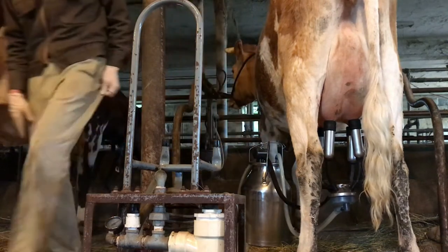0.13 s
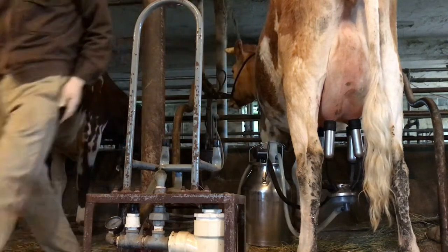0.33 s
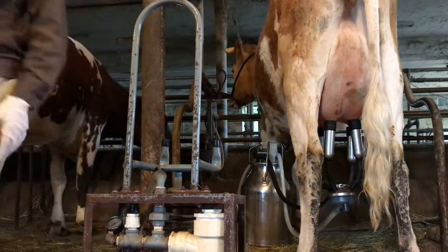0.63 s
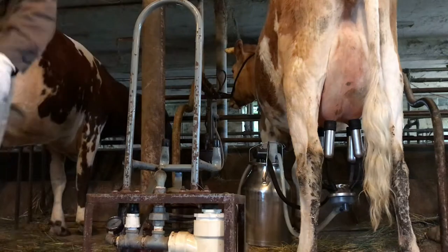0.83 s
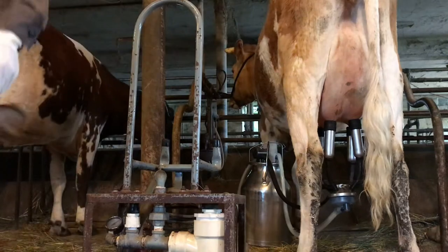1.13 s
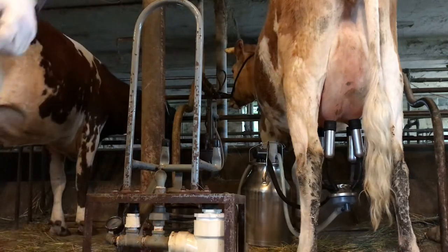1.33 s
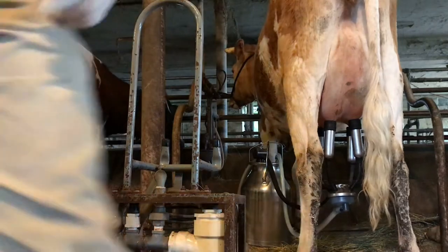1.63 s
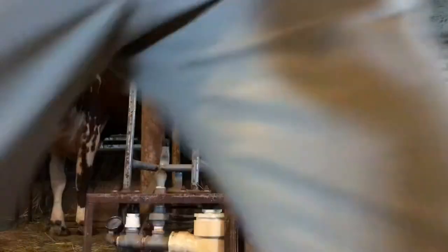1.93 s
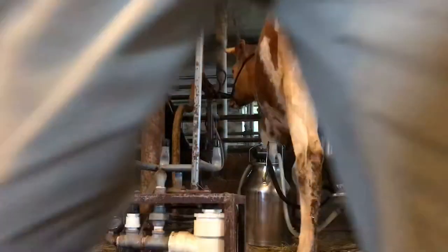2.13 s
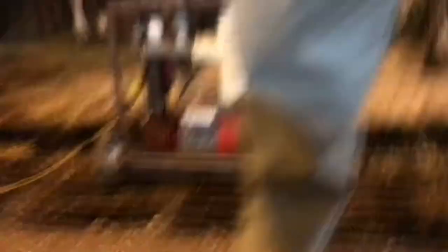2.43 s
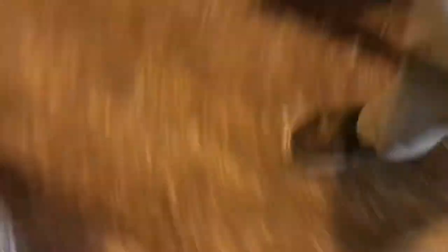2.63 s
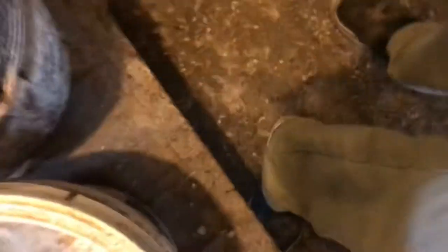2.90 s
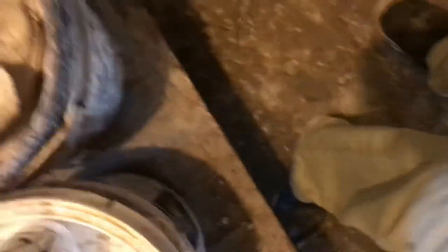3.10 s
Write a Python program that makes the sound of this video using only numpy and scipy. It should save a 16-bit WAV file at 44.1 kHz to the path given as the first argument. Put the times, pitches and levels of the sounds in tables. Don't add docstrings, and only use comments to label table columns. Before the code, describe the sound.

A vacuum pump drones loudly from the start, a fast steady buzz with air hiss, metallic rattle and thin whine in a slightly reverberant barn. Faint plastic ticks come about every half second until 2.7. Treble dips around 1.5 and 2.1; dull microphone knocks cluster at 2.1-2.3, softer ones at 2.55-2.65. The drone turns duller around 2.5, nearly cuts out with tiny clicks at 3.06-3.15, then resumes abruptly, more distant.

```python
import sys
import numpy as np
from scipy import signal
from scipy.fft import rfft, irfft
from scipy.io import wavfile
from scipy.ndimage import uniform_filter1d

SR = 44100
rng = np.random.default_rng(int(sys.argv[2]) if len(sys.argv) > 2 else 0)


def field_ratio(decibels):
    return 10 ** (np.asarray(decibels, dtype=float) / 20)


def dump_mix(stems):
    frames = np.atleast_2d(stems).T
    limited = np.clip(frames, -1, 1)
    pcm = np.round(limited * 32767).astype(np.int16)
    wavfile.write(sys.argv[1], SR, pcm)


N = 143766

BARN_DB, BARN_T60_S, PATCH_DB = -11, 0.2, 0.7

# (time [s], peak level [dB], frequency [Hz])
TICKS = [
    (.084, -29, 4250),
    (.6122, -25.5, 4170),
    (1.1208, -29, 4350),
    (1.6477, -27, 4230),
    (2.156, -34, 4350),
    (2.661, -37, 4100),
]
# (frequency ratio [1], level [dB])
TICK_CLUSTER = [(.95, -6), (.985, -3), (1.02, -3), (1.065, -6)]
# (frequency [Hz], level [dB])
TICK_BODY = [(3440, -5.5), (1130, -3)]
TICK_T60_S = 0.05

# (time [s], level [dB], frequency [Hz], decay time T60 [s])
BUMPS = [(2.108, -28, 170, .04), (2.118, -31, 69.6, .1), (2.142, -24, 65, .1), (2.181, -12, 130.2, 0.075),
         (2.186, -19, 85, .06), (2.197, -22, 292, 0.043), (2.1822, -16, 243, 0.037),
         (2.2143, -15, 344, 0.025), (2.2159, -20, 560, .02), (2.2185, -11.5, 214, 0.037),
         (2.224, -20, 120, .04), (2.249, -24, 254, 0.031), (2.286, -25.5, 340, 0.04),
         (2.29, -29, 540, 0.022), (2.24, -31, 50, .12), (2.536, -26, 76.4, 0.092), (2.556, -23.5, 55, 0.13),
         (2.615, -34, 60, .12), (2.65, -30, 60, .1)]
SCUFF_DB, SCUFF_HZ = -23, 500

VANES_DB = [-2.5, -4.5, -9, -2.5]
# (time [s], peak level [dB])
SLAPS = [(0.179, -13), (0.216, -10), (0.4953, -14), (0.5746, -13.5), (0.6706, -9.5), (0.7014, -9),
         (0.821, -10), (0.842, -9), (0.8821, -11), (0.9129, -9), (1.0174, -11), (1.094, -12.5),
         (1.1312, -11.5), (1.1617, -10), (1.3135, -11), (1.3412, -11), (1.5826, -13), (1.6998, -12),
         (1.7277, -10.5), (1.757, -11), (1.7959, -10), (1.8406, -7.5), (1.9015, -12), (1.9717, -9),
         (1.9899, -8.5), (2.0158, -13.5), (2.072, -12), (2.1211, -11), (2.191, -10), (2.2188, -11.5),
         (2.2518, -10.5), (2.2962, -11.5), (2.3316, -10.5), (2.3594, -11), (2.402, -11), (2.4284, -14),
         (2.4633, -9.5), (2.569, -13), (2.7437, -14), (2.9564, -12)]
SHAFT_HZ = 28.47
KNOCK_DB, KNOCK_SPREAD_DB, KNOCK_JITTER_S, KNOCK_TOP_HZ = -11, 2, 0.00004, 3600
PUFF_DEPTH, PUFF_SHARE = 0.14, 0.49
FLICKER_DB, RATTLE_DB, RATTLE_PER_S = 1.5, -9, 500
SLAP_DB, SLAP_S = 16, 0.0046

# (shaft order [1], rms level [dB])
HUM = [(2.08, -60.5), (4, -37.5), (8, -43.5), (11, -56)]
# (shaft order [1], rms level [dB])
WHINE = [(28, -57.5), (30, -58), (31.4, -45.5), (32, -41.5), (33, -44), (35, -53.5), (37, -53.5), (40, -39),
         (41, -62), (42, -45), (44, -47), (47, -49.5), (48, -62), (49, -47.5), (51, -50.5), (52, -60),
         (55, -54), (57, -50), (61, -47.5), (63, -46), (65, -48), (67, -42), (74, -49), (92, -62.5),
         (96, -53.5), (100, -50), (105, -48), (106, -47.5), (113, -63)]
# (shaft order [1], rms level [dB])
DRONE = [(13, -52.5), (16, -64.5), (20, -51), (24, -60.5), (26, -59.5)]
HUM_WAVER, WHINE_WAVER = 0.05, 0.17
WHINE_TURNED_DB, WHINE_FAR_DB, HUM_FAR_DB = -9.5, -7, -7

# (frequency [Hz], width [Hz], level [dB])
CASING = [(359, 38, -13.5), (565, 87, -15), (905, 70, -3.5), (1150, 110, -4.5), (1380, 130, -10),
          (1793, 190, -3), (1893, 72, -0.5), (2210, 250, -7), (2690, 170, -12), (3018, 125, -1),
          (3210, 140, -6.5), (3527, 170, -6.5), (4500, 200, -14)]
# (frequency [Hz], width [Hz], level [dB])
SILENCER = [(5336, 140, -5), (5913, 125, 3), (6250, 400, 1.5), (6690, 290, -4), (7350, 340, -6),
            (8480, 140, -7), (9325, 155, 0), (9614, 200, 0), (10007, 180, 2), (10900, 190, -5.5),
            (11700, 320, -10), (13140, 250, -10), (14430, 310, -6.5), (15650, 200, -8)]
# (frequency [Hz], width [Hz], level [dB])
TURNED = [(330, 230, -21.5), (880, 47, -9.5), (1300, 120, -8.5), (1890, 540, -5.5), (2990, 200, -3),
          (3460, 410, -9.5), (4480, 440, -14.5), (5350, 150, -5), (6100, 410, -2), (6480, 220, 0.5),
          (7300, 170, -8), (8860, 220, -14), (9680, 870, -3.5), (10800, 480, -5.5), (13900, 700, -18)]
# (frequency [Hz], width [Hz], level [dB])
FAR = [(350, 200, -22), (1230, 130, -5.5), (1880, 730, -6), (3033, 130, 0.5), (3580, 250, -6),
       (4540, 200, -8.5), (5550, 150, -9), (6100, 480, -3.5), (6470, 150, 4.5), (7640, 250, -5.5),
       (8350, 250, -7.5), (9460, 240, -1), (10600, 300, -11.5), (11500, 300, -15), (14100, 300, -17)]
CASING_DB, SILENCER_DB, TURNED_DB, FAR_DB = -17, -14, -15, -12.5
SKIRT = 3.63

# (frequency [Hz], level [dB])
RUSH = [(40, -12), (65, -10.5), (450, -12), (1500, -1.5), (4000, -10.5), (5000, -7.5), (7500, -3.5),
        (15800, -5.5)]
RUSH_DB, RUSH_TURNED_DB, RUSH_FAR_DB = -22.5, -4, -0.5
RUSH_TURNED_TILT_DB = 4

# (time [s], loudness [dB], treble screening [dB])
PATH = [(0.0, -20.5, -4.5), (0.02, -22, -9.5), (1.43, -22.5, -7.5), (1.55, -25, -12), (1.66, -24, -7),
        (1.97, -23, -9.5), (2.11, -23, -13), (2.21, -23.5, -13), (2.22, -24, -6.5), (2.43, -23.5, -6),
        (2.6, -21.5, -10.5), (2.79, -21, -10), (3.05, -21.5, -11)]
PATH_REF_DB, SCREEN_REF_DB, SCREEN_HZ = -23.5, -8, 7650
TURN_S, TURN_SPAN_S = 2.5, 0.4

# (middle time [s], length [s], frequency [Hz], width [Hz], level [dB])
GLINTS = [(0.64, 0.1, 1197, 50, 7), (0.96, .15, 1197, 50, 5), (1.88, 0.23, 1850, 400, 2),
          (1.98, 0.27, 6360, 1000, 3), (2.15, .3, 3070, 700, -4.5), (2.18, 0.24, 900, 320, 2.5),
          (2.355, 0.12, 9650, 1300, 3), (2.4, .25, 4300, 1300, 2), (2.6, .12, 6200, 1300, -1.5),
          (2.5, .14, 6700, 500, 4), (2.9, 0.11, 6550, 600, 3.5), (2.8, .1, 9650, 1300, -4),
          (2.75, .15, 8200, 800, -3), (2.97, .18, 10900, 1300, 3), (1.45, 0.21, 1000, 180, -1.5),
          (1.09, .2, 3050, 570, 2.5), (2.245, 0.065, 6600, 1100, 3.5), (2.61, 0.14, 9700, 1200, 2),
          (2.9, .14, 6300, 1200, 2.5), (1.55, .14, 7500, 1000, -2.5), (1.57, 0.22, 10000, 600, -2.5),
          (1.9, .16, 4200, 1200, -2), (1.0, .3, 6200, 1100, -1), (2.9, .2, 6400, 800, -2),
          (1.83, .2, 1200, 250, -2), (2.1, 0.18, 8300, 900, -1.5)]

# (time [s], level [dB], decay [dB/s], end time [s])
LEAKS = [
    (3.0603, -22, 500, 3.0715),
    (3.0715, -46, 300, 3.079),
    (3.0768, -17, 9000, 3.081),
    (3.079, -58, 100, 3.0945),
    (3.0905, -36, 9000, 3.0945),
    (3.1525, -26, 9000, 3.1546),
]
CUT_S, BACK_S = 3.0603, 3.1546
EDGE_HZ, CEILING = 15750, 0.6


def evened(x):
    return x / np.sqrt(np.mean(x ** 2) + 1e-20)


def add(mix, s, sound):
    part = mix[round(s * SR):][:len(sound)]
    part += sound[:len(part)]


def drift(hz):
    points = rng.standard_normal(round(N / SR * hz) + 4)
    return np.interp(np.arange(N) / SR * hz, np.arange(len(points)), points)


def coloured(x, gain):
    return irfft(rfft(x) * gain(np.fft.rfftfreq(N, 1 / SR)), N)


def barn(x):
    t = np.arange(round(0.3 * SR)) / SR
    tail = rng.standard_normal(len(t)) * field_ratio(-60 * t / BARN_T60_S) * (t > 0.004)
    tail = tail / np.linalg.norm(tail)
    wet = x + field_ratio(BARN_DB) * signal.oaconvolve(x, tail)[:N]
    z = signal.stft(wet, nperseg=512)[2]
    patches = rng.standard_normal(z.shape[::-1])
    patches = uniform_filter1d(patches, size=8, axis=0)
    patches = evened(uniform_filter1d(patches, size=5, axis=1))
    return evened(signal.istft(z * field_ratio(PATCH_DB * patches.T), nperseg=512)[1][:N])


def ring(db, hz, t60):
    t = np.arange(0, t60, 1 / SR)
    start = np.minimum(t * hz * 2, 1)
    return field_ratio(db - 60 * t / t60) * start * np.sin(2 * np.pi * hz * t)


def pulsator():
    out = np.zeros(N)
    scatter = rng.uniform(-1, 1, (len(TICKS), 4))
    for (s, db, hz), z in zip(TICKS, scatter):
        for k, (ratio, mode_db) in enumerate(TICK_CLUSTER):
            mode_hz = hz * ratio * (1 + 0.006 * z[k])
            add(out, s + 0.001 * (1 + z[k]), ring(db + mode_db, mode_hz, TICK_T60_S))
        for mode_hz, mode_db in TICK_BODY:
            add(out, s, ring(db + mode_db, mode_hz, TICK_T60_S))
    return out


def handling():
    knocks, scuff = np.zeros(N), np.zeros(N)
    for s, db, hz, t60 in BUMPS:
        t = np.arange(0, t60, 1 / SR)
        add(knocks, s, -ring(db, hz, t60))
        add(scuff, s, field_ratio(db + SCUFF_DB - 60 * t / t60))
    noise = rng.standard_normal(N)
    grit = evened(coloured(noise, lambda f: (f / SCUFF_HZ) / (1 + (f / SCUFF_HZ) ** 3)))
    return knocks + scuff * grit


def drive():
    vane_hz = 4 * SHAFT_HZ
    count = int(N / SR * SHAFT_HZ * 4) - 1
    z = rng.standard_normal((count, 2))
    at = (np.arange(count) + 0.5) / vane_hz + KNOCK_JITTER_S * z[:, 0]
    knocks = np.zeros(N)
    knocks[np.round(at * SR).astype(int)] = field_ratio(np.resize(VANES_DB, count) + KNOCK_SPREAD_DB * z[:, 1])

    phase = np.arange(400) / SR * vane_hz
    puff = signal.oaconvolve(knocks, np.exp(-phase / PUFF_SHARE))[:N]
    pulsation = 1 + PUFF_DEPTH * (puff / puff.mean() - 1)
    hiss = rng.standard_normal(N) * pulsation * field_ratio(FLICKER_DB * drift(90))
    t = np.arange(0, 4 * SLAP_S, 1 / SR)
    for s, db in SLAPS:
        add(hiss, s, field_ratio(db + SLAP_DB) * np.exp(-t / SLAP_S) * rng.standard_normal(len(t)))

    rattle = (rng.random(N) < RATTLE_PER_S / SR) * rng.standard_normal(N)
    dull = coloured(evened(knocks), lambda f: 1 / (1 + 1j * f / KNOCK_TOP_HZ) ** 2)
    return evened(evened(hiss) + field_ratio(RATTLE_DB) * evened(rattle) + field_ratio(KNOCK_DB) * dull)


def tones(lines, waver):
    t, out = np.arange(N) / SR, np.zeros(N)
    for order, db in lines:
        turn = 2 * np.pi * (order * SHAFT_HZ * t + rng.random())
        in_phase = (1 + waver * drift(8)) * np.cos(turn)
        quadrature = waver * drift(8) * np.sin(turn)
        out += np.sqrt(2 / (1 + 2 * waver ** 2)) * field_ratio(db) * (in_phase + quadrature)
    return out


def body(parts, rush_db, tilt_db=0):
    def gain(f):
        hz, db = np.transpose(RUSH)
        rush = np.interp(np.log(f + 1), np.log(hz), db, left=-45)
        power = field_ratio(rush + rush_db + tilt_db * f / 1e4) ** 2
        for modes, level_db in parts:
            for mode_hz, width, mode_db in modes:
                power = power + field_ratio(level_db + mode_db) ** 2 / (1 + abs(2 * (f - mode_hz) / width) ** SKIRT)
        cepstrum = irfft(np.log(power) / 2, N)
        cepstrum[1:N // 2] *= 2
        cepstrum[N // 2 + 1:] = 0
        return np.exp(rfft(cepstrum))
    return gain


def glints(x):
    t, out = np.arange(N) / SR, x
    for s, length, hz, width, db in GLINTS:
        band = coloured(x, lambda f: 1 / (1 + (2 * (f - hz) / width) ** 4))
        moment = 1 / (1 + (2 * (t - s) / length) ** 4)
        out = out + band * (field_ratio(db * moment) - 1)
    return out


def pump():
    t, x = np.arange(N) / SR, barn(drive())
    far = t > BACK_S - 0.03
    turn = np.clip((t - TURN_S) / TURN_SPAN_S + 0.5, 0, 1)
    facing = coloured(x, body([(CASING, CASING_DB), (SILENCER, SILENCER_DB)], RUSH_DB))
    turned = coloured(x, body([(TURNED, TURNED_DB)], RUSH_DB + RUSH_TURNED_DB, RUSH_TURNED_TILT_DB))
    whine = tones(WHINE, WHINE_WAVER) + tones(DRONE, HUM_WAVER)
    near = (1 - turn) * facing + turn * turned + whine * field_ratio(WHINE_TURNED_DB * turn)

    s, level_db, screen_db = np.transpose(PATH)
    treble = coloured(near, lambda f: 1 / (1 + (SCREEN_HZ / (f + 1)) ** 4))
    near = near + treble * (field_ratio(np.interp(t, s, screen_db) - SCREEN_REF_DB) - 1)
    near = near * field_ratio(np.interp(t, s, level_db) - PATH_REF_DB)

    away = coloured(x, body([(FAR, FAR_DB)], RUSH_DB + RUSH_FAR_DB))
    away = away + field_ratio(WHINE_FAR_DB) * whine
    hum = tones(HUM, HUM_WAVER) * field_ratio(HUM_FAR_DB * far)
    return np.where(far, away, glints(near)) + hum


def scene():
    return np.tile(pulsator() + handling() + pump(), (2, 1))


def top_cut(x):
    return signal.sosfilt(signal.butter(12, 16920, fs=SR, output="sos"), x)


def record(dry):
    t = np.arange(N) / SR
    gate = 1.0 * ((t < CUT_S) | (t > BACK_S))
    for s, db, fall, end in LEAKS:
        onset = np.clip((t - s) / 0.0008, 0, 1)
        gate = gate + (t > s) * (t < end) * onset * field_ratio(db - fall * abs(t - s))
    limited = CEILING * np.tanh(dry / CEILING)
    taps = signal.firwin(1601, EDGE_HZ, window=("kaiser", 10), fs=SR)[None]
    mix = uniform_filter1d(gate, size=31) * signal.oaconvolve(limited, taps, "same")
    return top_cut(mix)


dry = scene()
out = record(dry)
dump_mix(out)
```